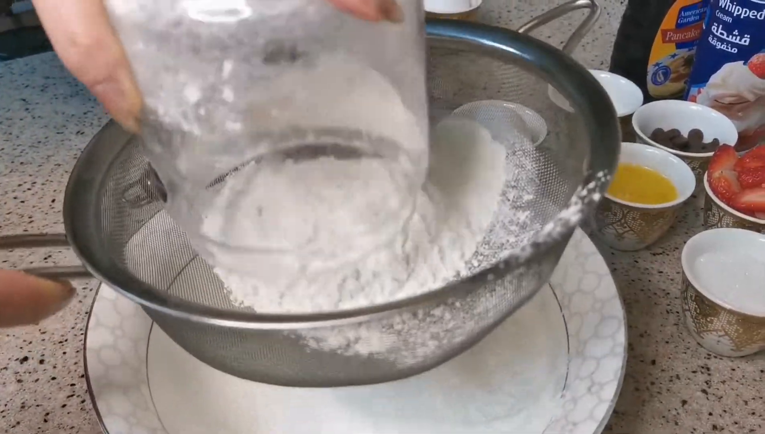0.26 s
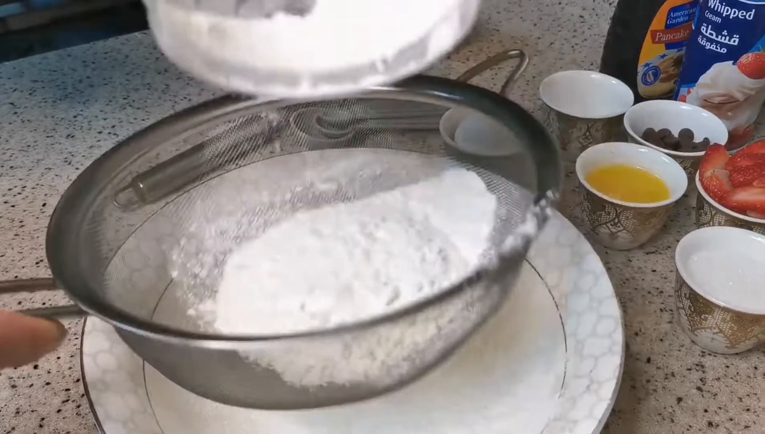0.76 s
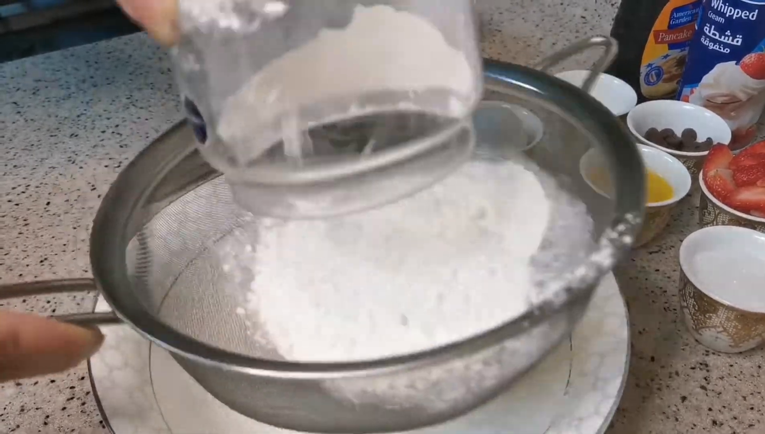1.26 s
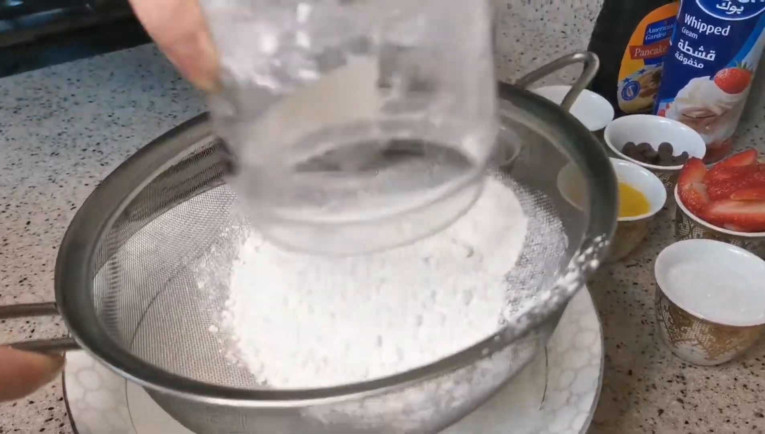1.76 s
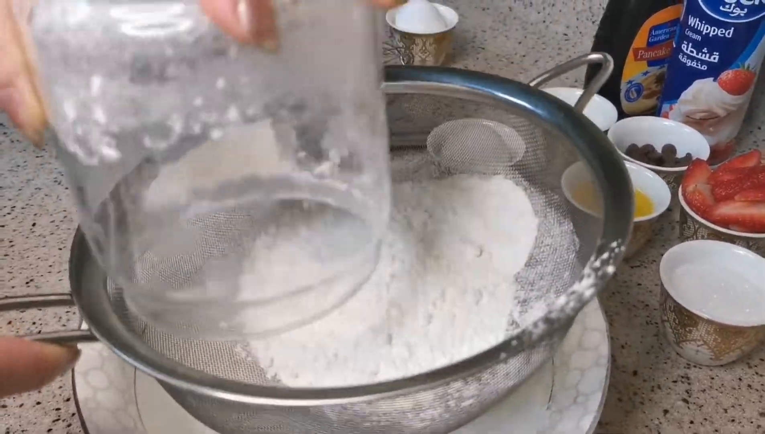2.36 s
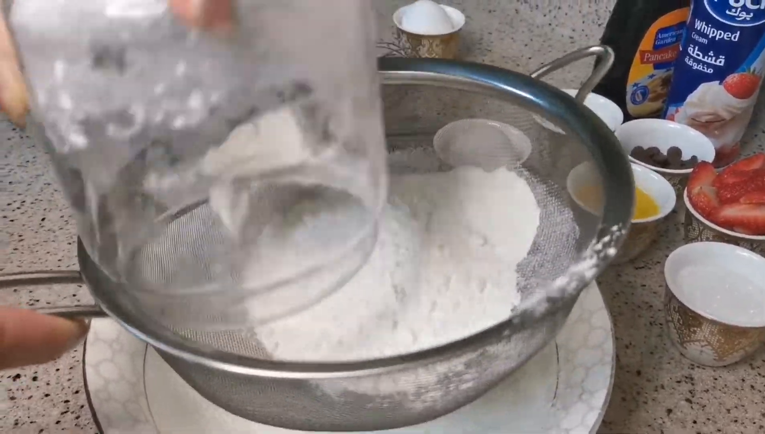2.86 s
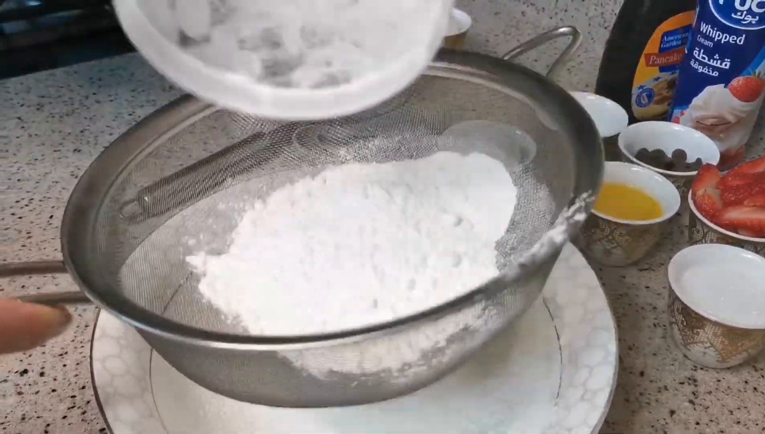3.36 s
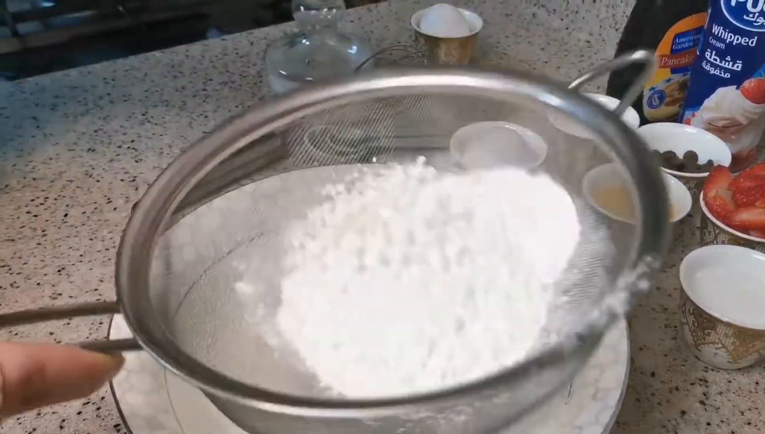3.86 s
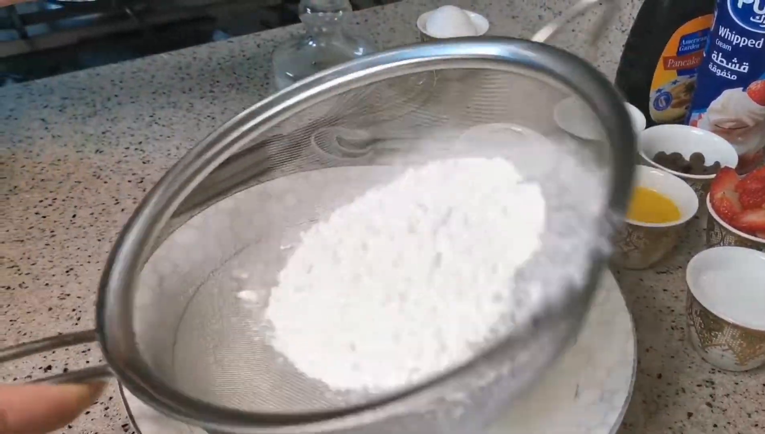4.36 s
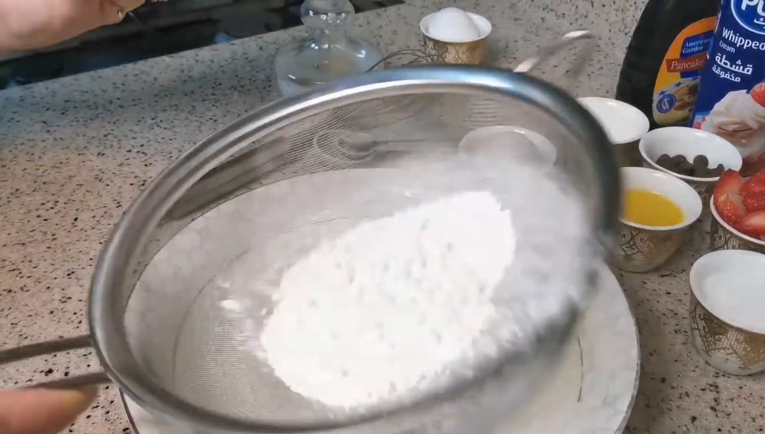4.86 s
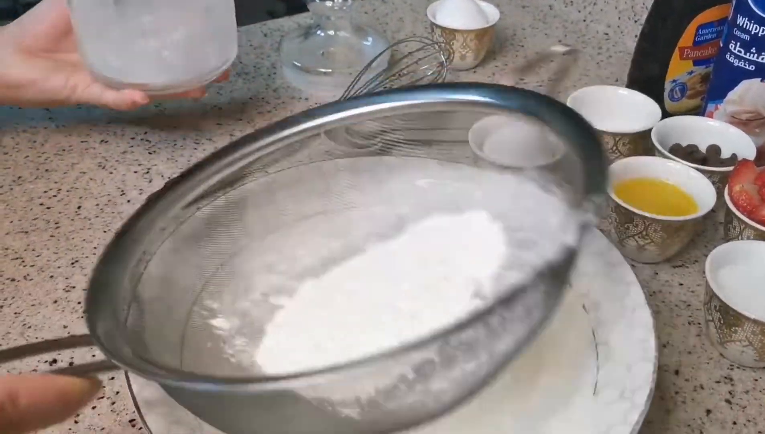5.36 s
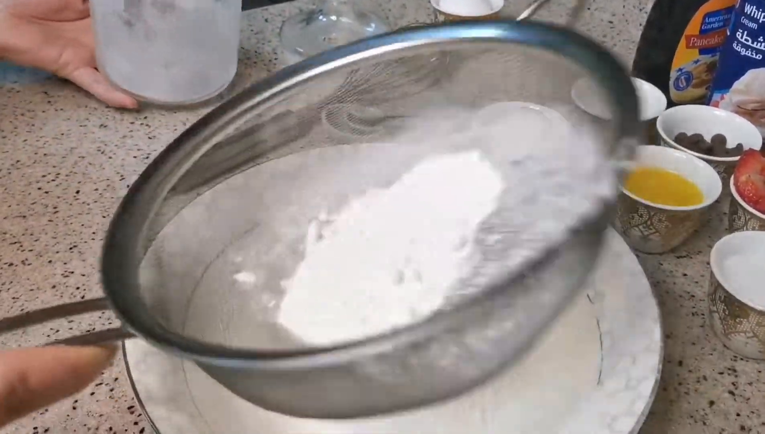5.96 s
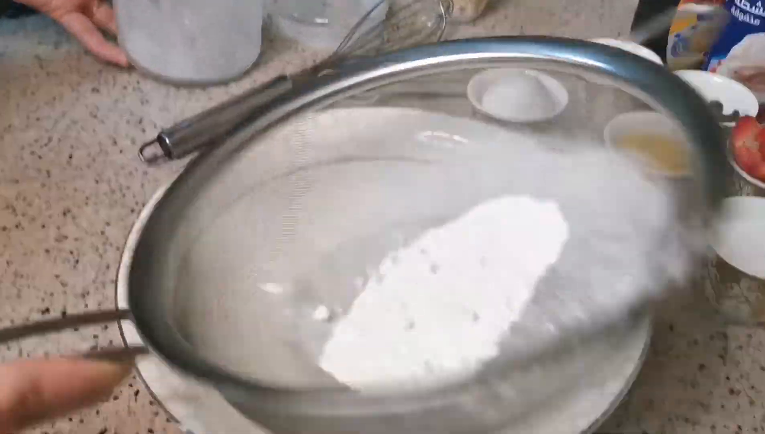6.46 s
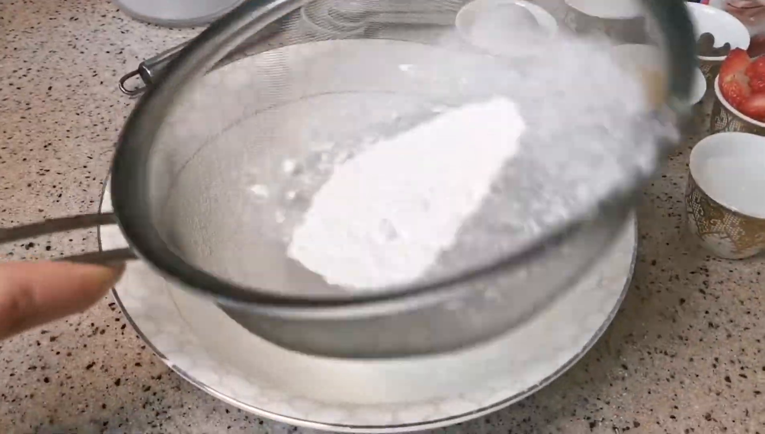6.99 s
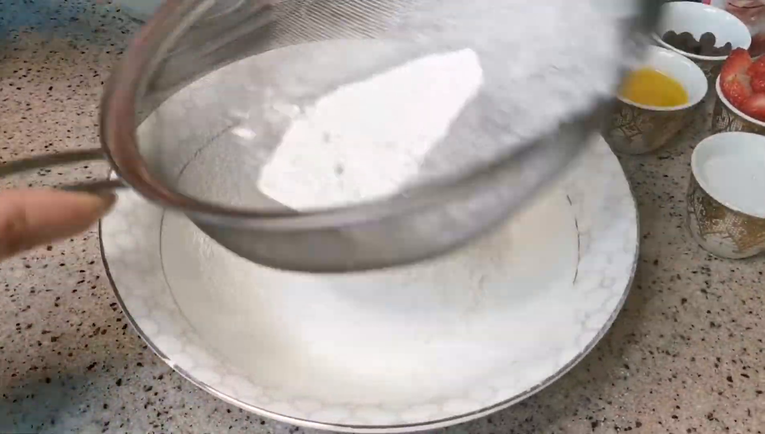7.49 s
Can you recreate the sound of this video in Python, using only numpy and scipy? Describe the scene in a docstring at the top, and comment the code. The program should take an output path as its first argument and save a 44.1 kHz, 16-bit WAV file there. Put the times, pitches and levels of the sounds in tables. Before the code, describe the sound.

Quiet sifting in a hard kitchen: a jar raps the steel rim several times, then thuds onto the counter, with a sharp crisp tick at the end.

```python
"""In a hard-walled kitchen, flour is sifted over a steady hiss and a low appliance rumble and hum, all made
from shaped noise. Small things tick and scuff as brief noise puffs, and the sieve's rim sings faintly when it
is rubbed. A jar taps the steel rim, which rings as fading tones; later it is set down on the stone counter as
knocks made of filtered pushes, and a cup clinks as a few short tones. Of the two microphone ports, the left one
gets the sifting and each separate sound first."""
import sys
import numpy as np
from scipy import signal
from scipy.fft import rfft, irfft, next_fast_len
from scipy.io import wavfile
from scipy.ndimage import uniform_filter1d, map_coordinates

SR = 44100
rng = np.random.default_rng(int(sys.argv[2]) if len(sys.argv) > 2 else 0)


def generate_wav(sig):
    """Save sig (samples, or channels by samples) to the path in sys.argv[1] as 16-bit PCM at SR."""
    pcm = np.round(np.clip(np.atleast_2d(sig).T, -1, 1) * 32767).astype(np.int16)
    wavfile.write(sys.argv[1], SR, pcm)


N = 340893  # length [samples]

# Peaks below are those of the sound itself, before panning and reflections; positive left-right leans left.
# Hiss of flour on the mesh, of the steady background and of a late scuff, before gusts and port gains: (time
# [s], fizz level [dB], rustle level [dB])
HISS_LEVELS = [(0, -79, -75), (1.05, -78, -74.5), (1.62, -74.5, -73), (1.949, -79.5, -75.5),
               (2.4, -80, -72), (3.418, -78, -76), (3.799, -71.5, -70.5), (4.03, -72.5, -67),
               (4.32, -69, -69.5), (4.58, -75.5, -74), (4.859, -73.5, -69.5), (5.05, -69, -71),
               (5.25, -76, -76), (5.45, -68.5, -70), (5.62, -71.5, -72.5), (6.05, -78, -75.5),
               (6.6, -64, -67), (7.299, -74.5, -79), (7.551, -72, -72.5)]
# Colour of the fizzing hiss: (frequency [Hz], relative level [dB])
FIZZ_COLOUR = [(2500, -29.5), (3500, -8.5), (5400, -2), (6800, -2), (8200, -5.5), (9900, -5), (10700, 1.5),
               (11800, -3), (13800, -6), (15000, -6.5), (16300, -6.5)]
# Colour of the lower, rustling hiss: (frequency [Hz], relative level [dB])
RUSTLE_COLOUR = [(470, -35), (800, -6), (1260, -10), (1700, -6.5), (2500, -4), (3600, -5.5), (4200, -11),
                 (5200, -23.5), (6500, -31.5), (11000, -120)]
# Colour of the appliance rumble: (frequency [Hz], relative level [dB])
RUMBLE_COLOUR = [(12, -42), (20, -5), (43, 0), (75, -6.5), (102, 3.5), (130, -9.5), (197, -7), (226, -16),
                 (338, -13.5), (500, -26.5), (650, -47.5), (1100, -120)]
# Wavering hum lines, before leaning left: (frequency [Hz], width [Hz], level [dB])
HUM_LINES = [(52, 21, -67.5), (100.03, 18, -74.5), (201.4, 12, -72.5)]
# Where rumble and hum sit: (time [s], left-right [dB])
APPLIANCE_LEAN = [(0, 6.5), (2.4, 4), (3.2, 1.5), (5.301, 2.5), (6.3, 7), (7.73, 0.5)]
# Small hard touches: (time [s], peak [dB], centre [Hz], breadth [share of centre], left-right [dB],
# walls [dB], low when near)
TICK_EVENTS = [(.03, -63.5, 10900, 0.092, 24, -12), (.932, -58.5, 700, .8, -16, -10),
               (1.589, -58.5, 700, .9, -5, -13), (1.913, -58, 800, 1.5, -15, -12),
               (2.006, -52.5, 2800, 0.27, 5, -5), (5.754, -45.5, 5430, 0.18, 0, -3),
               (6.534, -43.5, 700, 2.8, -13, -1), (6.544, -45, 3000, 1.6, -13, -3),
               (6.664, -39.5, 2500, 6.5, -25, -37), (6.685, -35, 10000, .8, 2, -19.5),
               (6.848, -45.5, 700, 0.39, 9, -8), (7.584, -23.5, 4400, 0.64, 2, -2),
               (7.584, -46.5, 796, 0.51, 4.5, -4), (7.587, -15, 13500, 0.78, -8.5, -2.5),
               (7.591, -31, 7000, 2.5, -11, 6.5)]
# Short slides: (time [s], peak [dB], centre [Hz], length [s], left-right [dB])
SCUFF_EVENTS = [(0.78, -66.5, 8000, 0.048, 14), (0.961, -68, 9000, 0.041, 9), (1.066, -69, 9000, 0.051, 11),
                (6.555, -46.5, 6000, 0.05, -11), (6.647, -50, 4000, .07, -28),
                (6.684, -66.5, 5500, 0.12, -7), (6.804, -40, 680, 0.49, 0.5)]
# Rubs of the rim: (time [s], hold [s], level [dB])
RUB_EVENTS = [(1.44, 0.27, -73), (3.89, 0.23, -68.5)]
# Jar taps on the rim: (time [s], peak [dB], treble tilt [dB per octave], left-right [dB],
# ring time left by the grip [share])
RIM_TAPS = [(2.413, -16, -3, 6, 0.39), (2.765, -14, -0.5, 2.5, 0.41), (2.7827, -16, 3.5, -7.5, .12),
            (2.8429, -20, -2, -0.5, 0.42), (2.973, -7, -2.5, -6.5, 0.43)]
# Pitches of the rim's ringing modes: (frequency [Hz])
RIM_PITCHES = [328, 972, 1040, 1400, 2148, 2420, 2527, 2592, 3000, 4560, 5830, 6135, 6315, 8000, 9030, 9560,
               10560, 11430, 12140, 12500, 12730, 13470, 13950, 14640, 15560]
# The same modes in the same order, before tilt and grip: (strength [dB], time to fall 60 dB [s])
RIM_RINGS = [(-14, 0.07), (-9.5, 0.2), (-16, 0.014), (-2.5, 0.037), (-22, 0.13), (-22.5, 0.045), (-3, 0.24),
             (-15, 0.13), (-11.5, 0.079), (-11, 0.23), (-20.5, 0.26), (-16, 0.11), (-17, .15),
             (-21.5, 0.13), (-21.5, 0.25), (-36, 0.059), (-17, 0.075), (-19, 0.08), (-11, 0.079),
             (-19, 0.12), (-20.5, 0.21), (-26, .15), (-19.5, 0.15), (-32.5, 0.092), (-35, 0.21)]
# Jar on the counter: (time [s], peak [dB], centre [Hz], breadth [share of centre], thump [dB], chink [dB],
# rattle's time to fall 26 dB [s], left-right [dB]); thump and chink are relative to the blow;
# the peak is that of all three together
COUNTER_KNOCKS = [(5.653, -34, 200, 9, 7, -10, 0.12, 2), (5.668, -19.5, 722, 0.97, -3.5, -47, 0.014, 1.5),
                  (5.674, -29, 720, 1.1, -2, -41, 0.025, -9.5), (5.681, -25, 750, 0.72, 3, -24, 0.0092, 16),
                  (5.753, -35.5, 1500, 6, 7, -25, .004, -1), (5.88, -42, 1990, 1.8, 13.5, -35, .01, -8),
                  (5.95, -48, 300, .6, 48, -27, 0.0084, 8),
                  (6.19, -11, 1000, 1.05, -25.5, -38, 0.0043, -3.5),
                  (6.198, -21, 600, 2.4, -1.5, -50, 0.0099, 7.5),
                  (6.24, -40.5, 684, 0.87, -21, -49, 0.82, -4.5),
                  (6.871, -26, 783, 0.92, -7.5, -27, 0.015, 3.5),
                  (6.879, -6.5, 2000, 2.6, -23, -33, 0.0083, -6.5),
                  (6.883, -11, 1330, 2.4, -18.5, -19.5, 0.025, -4)]
# Resonances of jar and slab: (frequency [Hz], width [Hz], level [dB])
JAR_AND_SLAB = [(371, 49, 0), (528, 7.1, -6), (594, 100, -19), (899, 44, -13.5), (953, 37, -11.5),
                (1913, 263, -5), (2400, 350, -9.5), (3700, 470, -7.5)]
# Resonances of small steel parts: (frequency [Hz], width [Hz], level [dB])
STEEL_PARTS = [(6050, 1000, -12), (9310, 69, 1.5), (13100, 690, -8.5), (15630, 500, -18)]
# A small cup is jolted: (time [s], peak [dB])
CUP_JOLTS = [(5.653, -47), (5.681, -51)]
# Modes of the cup: (frequency [Hz], average strength [dB], time to fall 60 dB [s])
CUP_MODES = [(2524, -1.5, 0.13), (3780, -5, 0.092), (5274, -3, 0.13), (5320, -10, 0.13),
             (7040, -11.5, 0.27), (8760, -4, .06), (13360, 2, .071)]
# How fast the room's echo dies at each pitch: (frequency [Hz], time to fall 60 dB [s])
KITCHEN_ECHO = [(100, 0.77), (500, 0.47), (2500, 0.61), (6000, 0.55), (12000, 0.46)]

SHIFT_DB, SHIFT_GROWS = -77, 0.96  # hands' level at a rustle of -72 dB; their change [dB per dB of rustle]
TICK_S, SCUFF_BREADTH, SCUFF_ROOM_DB = 0.0049, 1.3, -20  # tick length; scuff breadth [share], walls
RUB_FADE_DB_PER_S, RUB_UPPER_DB = 110, -5.5  # fade speed; upper band relative to the tone
TAP_LOW_DB, TAP_ROOM_DB = -4, -2.5  # change of the low modes; walls
CHOKE_T60_S = 0.038  # the next touch of the jar stills what rings
KNOCK_ROOM_DB = -1  # walls
CLINK_PAN_DB, CLINK_ROOM_DB = -12, 1  # left-right; walls
NEAR_DB, NEAR_T60_S = -2, 0.0085  # counter and dishes scatter each sound differently to the two ports
TOP_HZ = 15850  # the microphone's upper limit


def amp(db):
    """Turn decibels into a plain gain."""
    return 10 ** (np.asarray(db) / 20)


def unit(x):
    """Scale x to an average strength (rms) of 1."""
    return x / np.sqrt(np.mean(x ** 2) + 1e-20)


def along(points, hz):
    """Read a curve of (frequency [Hz], value) points on a log frequency axis."""
    f, v = np.transpose(points)
    return np.interp(np.log(hz + 1), np.log(f + 1), v)


def wobble(rate):
    """Draw a smooth random curve with rate knots a second."""
    knots = rng.standard_normal(int(N * rate / SR) + 4)
    return map_coordinates(knots, [np.arange(N) * rate / SR])


def filtered(x, response):
    """Shape the spectrum of x with a response that depends on frequency."""
    n = x.shape[-1]
    m = next_fast_len(n + 8192)  # spare room for ringing
    return irfft(rfft(x, m) * response(np.fft.rfftfreq(m, 1 / SR)), m)[..., :n]


def resonance(f, hz, width_hz):
    """Give one resonant peak of gain 1 that rings only after it is pushed."""
    return 1j * f * width_hz / (hz * hz - f * f + 1j * f * width_hz)


def modes(table, f):
    """Add up a row of resonances with alternating signs."""
    return sum((-1) ** k * amp(db) * resonance(f, hz, width) for k, (hz, width, db) in enumerate(table))


def rush(response, alike, patchy_db):
    """Make stereo noise of rms 1 with randomly loud patches; alike is the left-right likeness."""
    z = signal.stft(rng.standard_normal((2, N + SR)), nperseg=512)[2]
    field = uniform_filter1d(rng.standard_normal(z.shape[1:]), size=6, axis=0)  # smooth over pitch
    field = uniform_filter1d(field, size=12, axis=1)  # smooth over time
    patchy = signal.istft(z * amp(patchy_db * unit(field)), nperseg=512)[1][:, :N]
    a, b = filtered(patchy, response)
    turn = np.arccos(np.clip(alike, -1, 1)) / 2
    shared, apart = np.cos(turn) * a, np.sin(turn) * b
    return unit(np.array([shared + apart, shared - apart]))


def room_echo():
    """Make the walls' answer from noise in which each frequency dies at its own speed."""
    hz, t, z = signal.stft(rng.standard_normal((2, SR * 3 // 4)), SR, nperseg=256)
    fade = amp(-60 * t / along(KITCHEN_ECHO, hz)[:, None])
    tail = signal.istft(z * fade, SR, nperseg=256)[1]
    tail = tail * (1 - np.exp(-np.arange(tail.shape[1]) / SR / 0.00097))  # echoes thicken at first
    # long waves reach both ports alike
    bass = filtered(tail[0] - tail[1], lambda f: 1 / (1 + (f / 600) ** 2))
    tail = np.array([tail[0], tail[1] + bass])
    return tail / np.linalg.norm(tail[0])


def near_scatter():
    """Make the direct sound plus quick reflections from nearby things, different at each port."""
    length = SR // 50
    near = rng.standard_normal((2, length)) * amp(-60 * np.arange(length) / SR / NEAR_T60_S)
    near = filtered(near, lambda f: 1j * f / (900 + 1j * f))  # small things scatter few long waves
    near *= amp(NEAR_DB) / np.linalg.norm(near, axis=1, keepdims=True)
    near[:, 0] = 1  # direct sound
    return near


def add(out, s, sound, db, pan_db, room_db, lag):
    """Place a sound of peak db at s seconds, with the right port's near sound lag samples late, plus echo."""
    sound = amp(db) * sound / np.abs(sound).max()
    heard = amp(room_db) * signal.fftconvolve(sound[None], room_echo(), axes=1)
    heard *= amp([[0.056 * pan_db], [-0.3 * pan_db]])  # the nearer walls lean the same way
    left, right = signal.fftconvolve(sound[None], near_scatter(), axes=1)
    heard[0, :len(left)] += amp(pan_db / 2) * left
    heard[1, lag:lag + len(right)] += amp(-pan_db / 2) * right
    start = round(s * SR)
    out[:, start:start + heard.shape[1]] += heard[:, :N - start]


def puffs(rows):
    """Make brief noise puffs that swell and fade around a centre pitch."""
    out, t = np.zeros((2, N)), np.arange(SR // 4) / SR
    for s, db, hz, breadth, length, pan_db, room_db in rows:
        puff = rng.standard_normal(len(t)) * (t / length) * np.exp(-4 * t / length)
        puff = filtered(puff, lambda f: resonance(f, hz, hz * breadth) ** 2)
        add(out, s, puff, db, pan_db, room_db, lag=10)
    return out


def sifting():
    """Flour hisses through the mesh in gusts over a steady background hiss; a lower rustle rides along, hands
    shift on the handles, and a late scuff adds its hiss."""
    s, *levels = np.transpose(HISS_LEVELS)
    fizz_db, rustle_db = [np.interp(np.arange(N) / SR, s, c) for c in levels]
    shift_db = SHIFT_DB + SHIFT_GROWS * (rustle_db + 72)
    gust = wobble(12)
    fizz = rush(lambda f: amp(along(FIZZ_COLOUR, f)), 0.2, patchy_db=0.6)
    rustle = rush(lambda f: amp(along(RUSTLE_COLOUR, f)), 0.12, patchy_db=2.14)
    shift = rush(lambda f: resonance(f, 550, 600) ** 2, 0.5, patchy_db=1.5)
    fizz *= amp(fizz_db + 1.3 * gust)
    rustle *= amp(rustle_db + 0.68 * gust)
    shift *= amp(shift_db + 0.74 * gust)
    left, right = fizz + rustle + shift
    return np.array([left * amp(3.0), np.roll(right, shift=18) * amp(2.66)])  # right port 18 samples late


def appliances():
    """A low noise rumble slowly wavers under fuzzy hum lines of narrow noise, both leaning left."""
    rumble_gain = amp(-64.5 + 0.45 * wobble(1))
    rumble = rumble_gain * rush(lambda f: amp(along(RUMBLE_COLOUR, f)), 0.9, patchy_db=2.0)
    hum = sum(amp(db) * rush(lambda f: resonance(f, hz, width) ** 2, 0.93, patchy_db=2.0)
              for hz, width, db in HUM_LINES)
    lean_db = np.interp(np.arange(N) / SR, *np.transpose(APPLIANCE_LEAN))
    return (rumble + hum) * amp([lean_db / 2, -lean_db / 2])


def ticks():
    """Small hard things touch, each making a very short puff of noise."""
    return puffs([(s, db, hz, breadth, TICK_S, pan_db, room_db)
                  for s, db, hz, breadth, pan_db, room_db in TICK_EVENTS])


def scuffs():
    """Something slides briefly over a surface close by, making a longer puff with little echo."""
    return puffs([(s, db, hz, SCUFF_BREADTH, length, pan_db, SCUFF_ROOM_DB)
                  for s, db, hz, length, pan_db in SCUFF_EVENTS])


def rubbing():
    """Friction makes the rim sing in a narrow band and a wider one above; each rub fades in, holds, fades out."""
    t = np.arange(N) / SR
    level = 0
    for s, hold, db in RUB_EVENTS:
        outside = np.maximum(0, np.maximum(s - t, t - s - hold))  # seconds before or after the hold
        level = level + amp(db - RUB_FADE_DB_PER_S * outside)
    tone = rush(lambda f: resonance(f, 2520, 130) ** 2, 0.34, patchy_db=1.1)
    upper = rush(lambda f: resonance(f, hz=4950, width_hz=450) ** 2, 0.3, patchy_db=1.5)
    return level * (tone + amp(RUB_UPPER_DB) * upper)


def taps():
    """Each tap rings the rim at new strengths; the hand damps it and the loose mesh blurs every tone."""
    out, t = np.zeros((2, N)), np.arange(SR // 2) / SR
    next_times = [row[0] for row in RIM_TAPS[1:]] + [N / SR]
    for (s, db, treble_db, pan_db, damping), next_s in zip(RIM_TAPS, next_times):
        ring = 0
        for hz, (level, t60) in zip(RIM_PITCHES, RIM_RINGS):
            # where and how hard the rim is struck
            tilt_db = treble_db * np.log2(1 + hz / 4000) + TAP_LOW_DB / (1 + (hz / 1600) ** 4)
            strength = amp(level + tilt_db + rng.normal(0, 1.5))
            blur = 0.028 * np.sqrt(hz / 2500) * np.cumsum(rng.standard_normal(len(t)))
            fade = amp(-60 * t / (damping * t60))
            ring = ring + strength * fade * np.sin(2 * np.pi * hz * t + blur)
        ring = ring * (1 - np.exp(-t / 0.00085))  # soft start
        choke = amp(-60 * np.maximum(0, t + s - next_s) / CHOKE_T60_S)
        crack = amp(-60 * t / 0.067) * rng.standard_normal(len(t))
        crack = filtered(crack, lambda f: resonance(f, 926, 1900) ** 1.17)
        add(out, s, ring * choke + 0.6 * crack, db, pan_db, TAP_ROOM_DB, lag=5)
    return out


def stone(f):
    """Jar and slab pass a blow through their resonances, weaker towards the treble."""
    return (0.2 + modes(JAR_AND_SLAB, f)) * resonance(f, 2220, 4200) * 2600 / (1j * f + 1)


def knocks():
    """A blow and a weaker rattle push jar and slab; the slab thumps and small steel parts chink."""
    out, t = np.zeros((2, N)), np.arange(SR // 4) / SR
    for s, db, hz, breadth, thump_db, chink_db, rattle, pan_db in COUNTER_KNOCKS:
        push = 0.094 * rng.standard_normal(len(t)) * amp(-26 * t / rattle)
        push[0] = 1  # the blow itself
        blow = unit(filtered(push, lambda f: stone(f) * resonance(f, hz, hz * breadth) ** 2.15))
        deep = (330 / hz) ** 1.9  # softer contacts reach further down
        thump = unit(filtered(push, lambda f: deep * resonance(f, 74, 55) ** 2
                              + resonance(f, 119.0, 65) ** 2 + 0.4 * resonance(f, 306, 110) ** 2))
        chink = unit(filtered(push, lambda f: modes(STEEL_PARTS, f) * resonance(f, 5700, 9900)))
        knock = blow + amp(thump_db) * thump + amp(chink_db) * chink
        add(out, s, knock, db, pan_db, KNOCK_ROOM_DB, lag=14)
    return out


def clinks():
    """The cup's few modes ring briefly, blurred as it rocks."""
    out, t = np.zeros((2, N)), np.arange(SR // 5) / SR
    for s, db in CUP_JOLTS:
        ring = 0
        for hz, level, t60 in CUP_MODES:
            strength = amp(level + rng.normal(0, 1.5) - 60 * t / t60)
            blur = 0.03 * np.cumsum(rng.standard_normal(len(t)))
            ring = ring + strength * np.sin(2 * np.pi * hz * t + blur)
        ring = ring * (1 - np.exp(-t / 0.0015))  # soft start
        add(out, s, ring, db, CLINK_PAN_DB, CLINK_ROOM_DB, lag=10)
    return out


def scene():
    """Add up everything heard in the kitchen."""
    return taps() + knocks() + clinks() + ticks() + scuffs() + sifting() + rubbing() + appliances()


def record(dry):
    """The microphone fades out the highest treble around its upper limit and keeps nothing beyond."""
    return filtered(dry, lambda hz: np.clip((TOP_HZ + 300 - hz) / 400, 0, 1) ** 3)


dry = scene()
out = record(dry)
generate_wav(out)
```